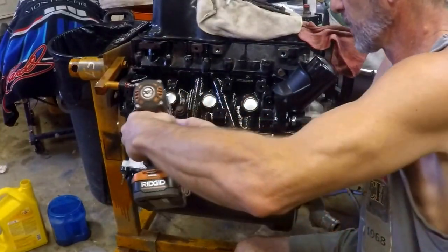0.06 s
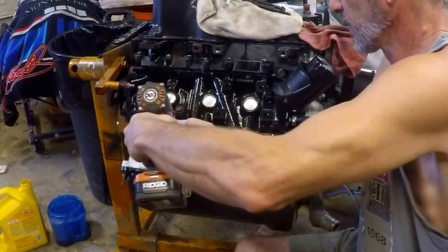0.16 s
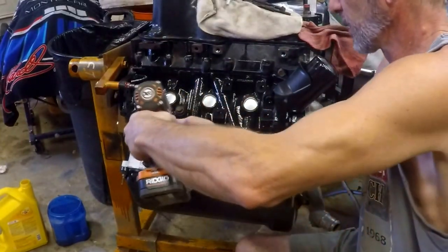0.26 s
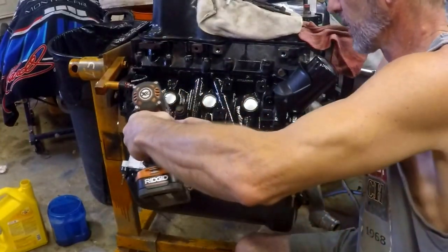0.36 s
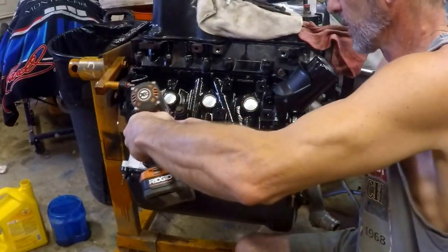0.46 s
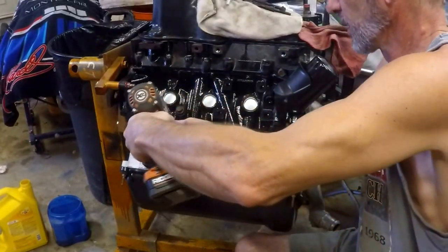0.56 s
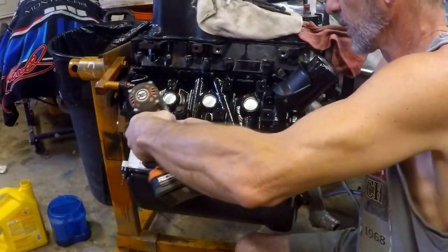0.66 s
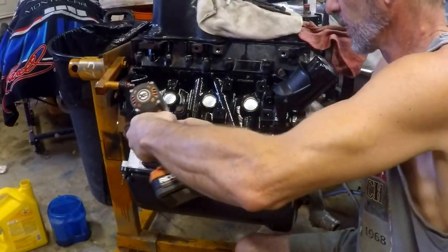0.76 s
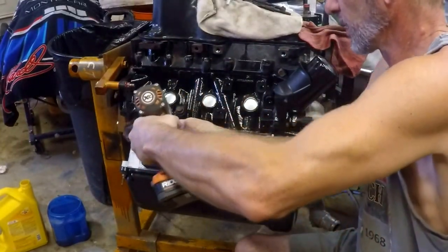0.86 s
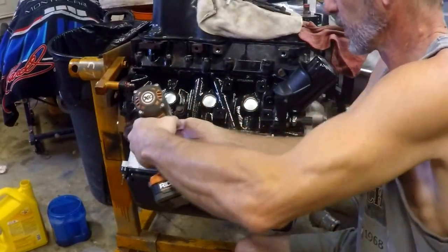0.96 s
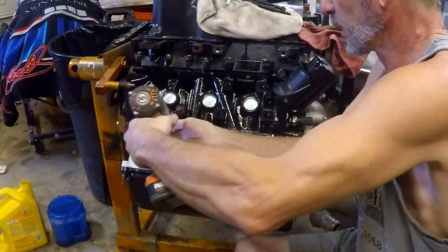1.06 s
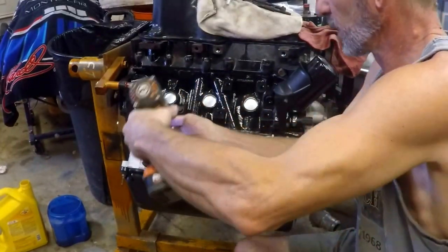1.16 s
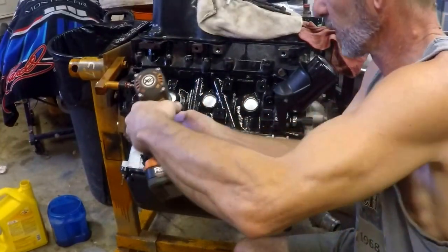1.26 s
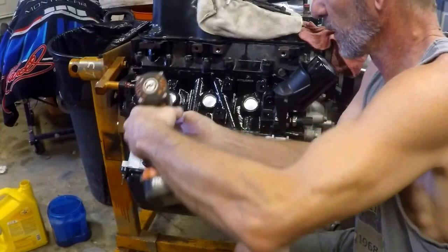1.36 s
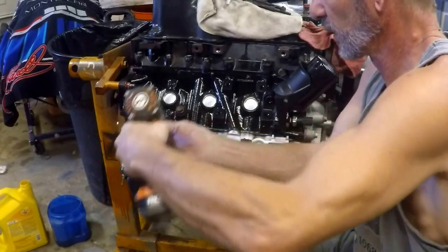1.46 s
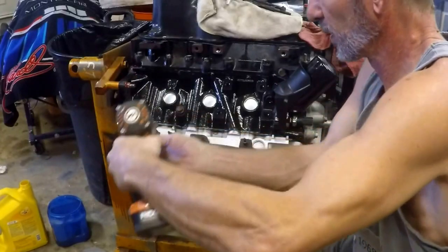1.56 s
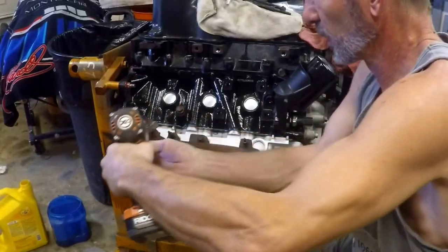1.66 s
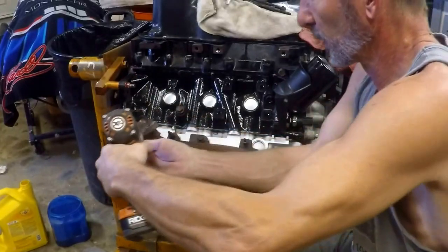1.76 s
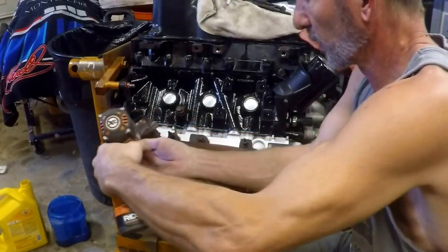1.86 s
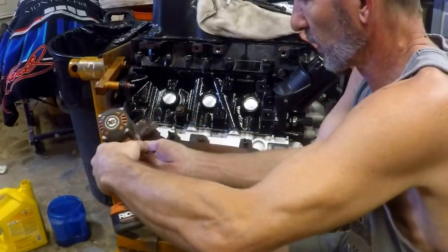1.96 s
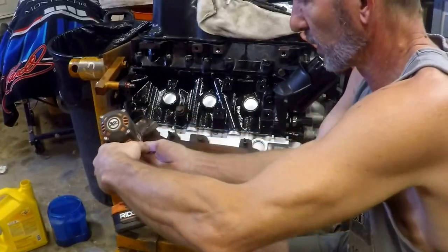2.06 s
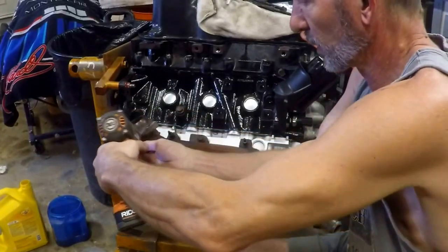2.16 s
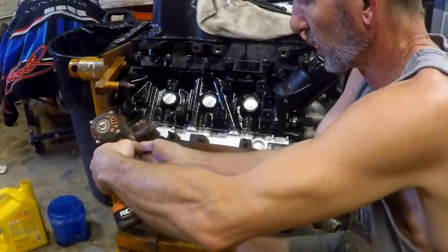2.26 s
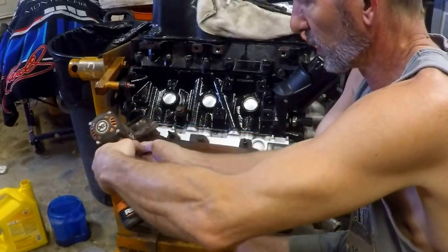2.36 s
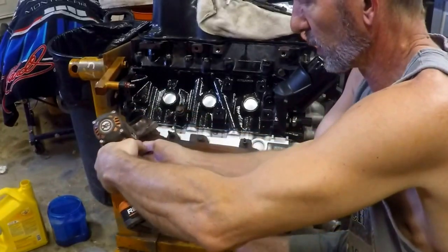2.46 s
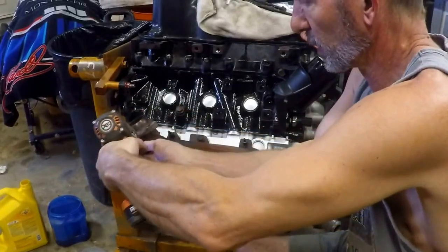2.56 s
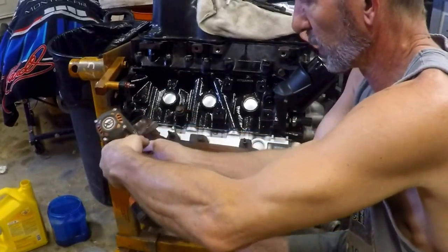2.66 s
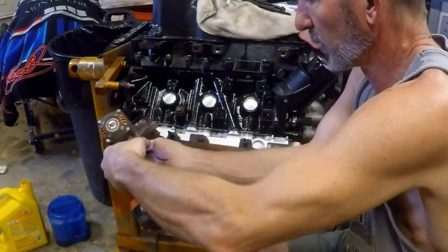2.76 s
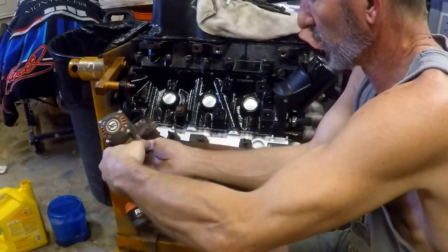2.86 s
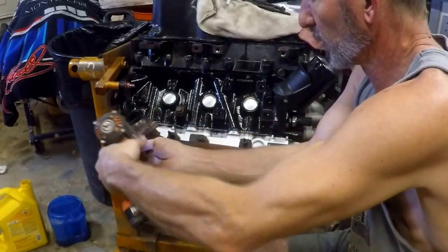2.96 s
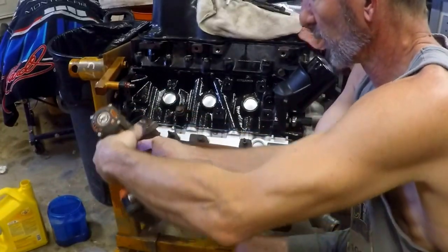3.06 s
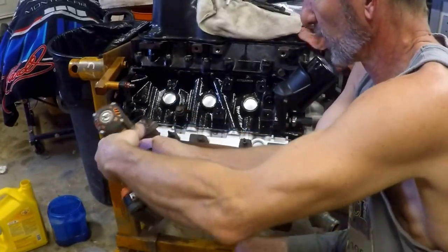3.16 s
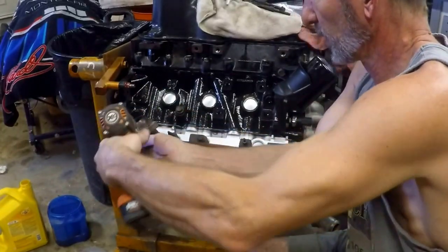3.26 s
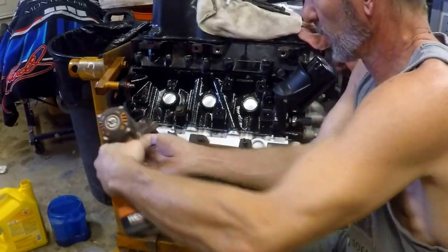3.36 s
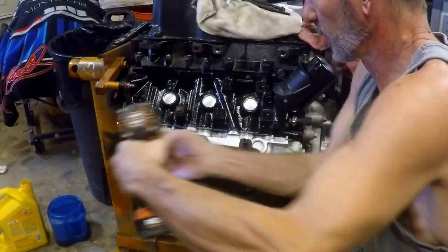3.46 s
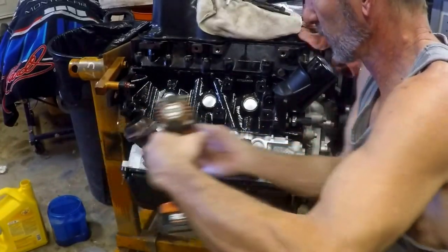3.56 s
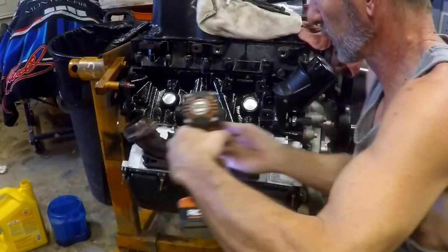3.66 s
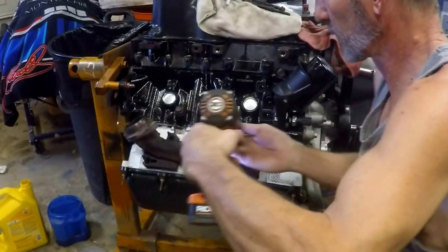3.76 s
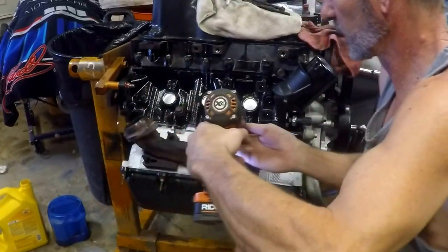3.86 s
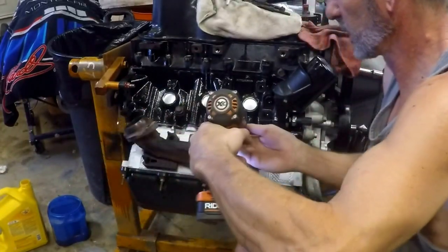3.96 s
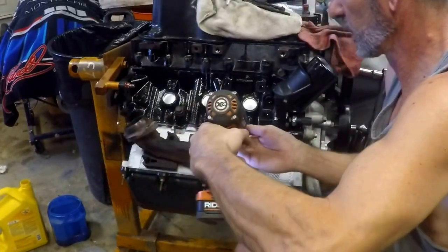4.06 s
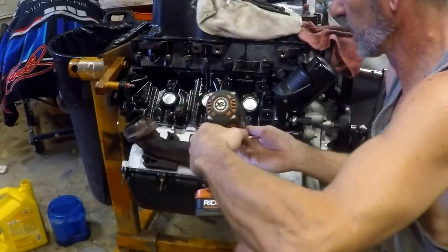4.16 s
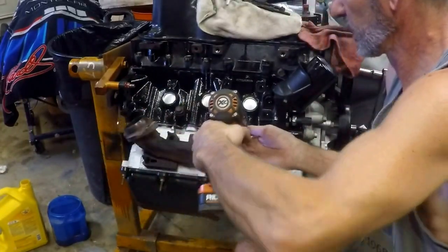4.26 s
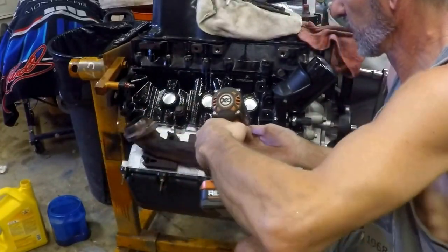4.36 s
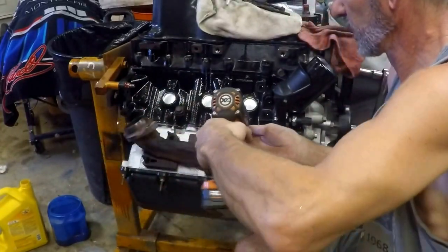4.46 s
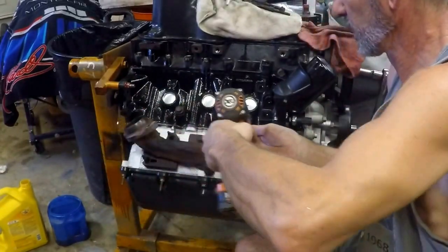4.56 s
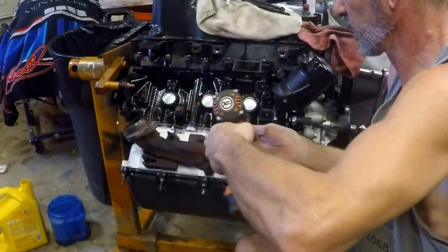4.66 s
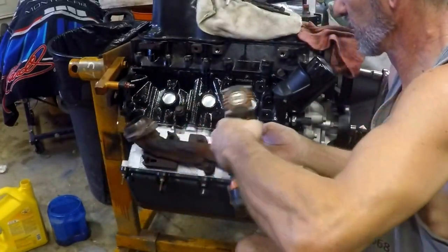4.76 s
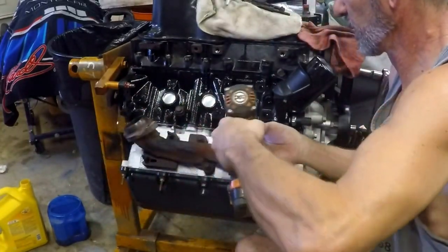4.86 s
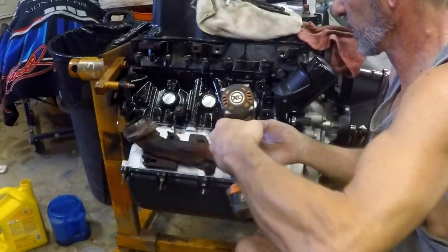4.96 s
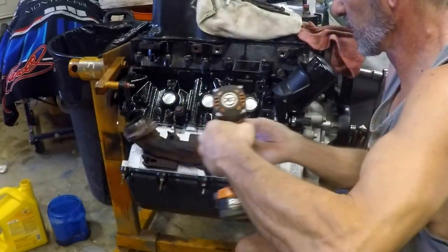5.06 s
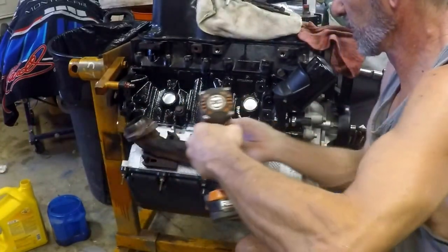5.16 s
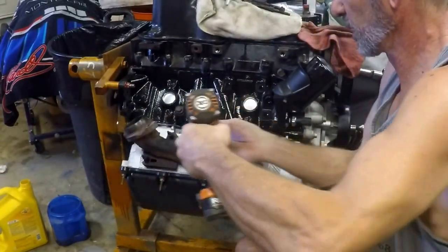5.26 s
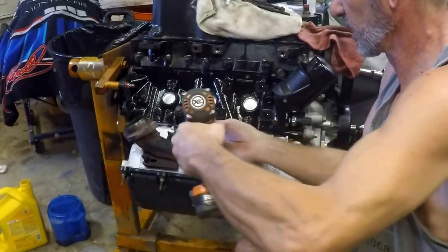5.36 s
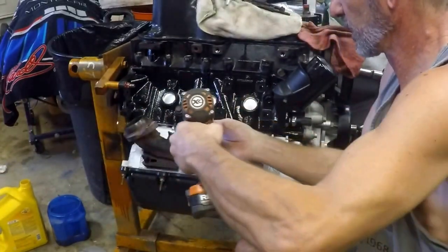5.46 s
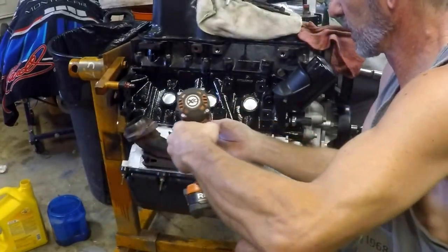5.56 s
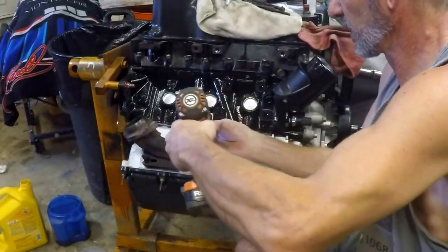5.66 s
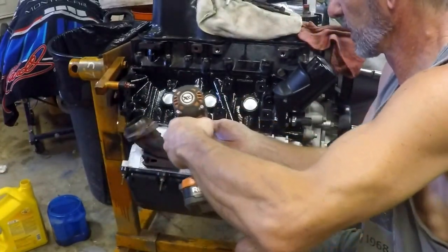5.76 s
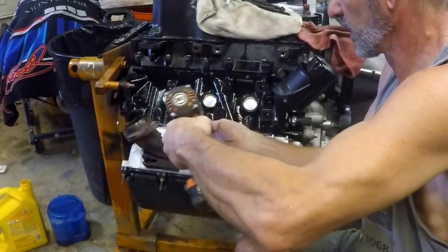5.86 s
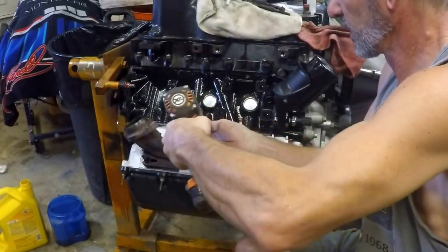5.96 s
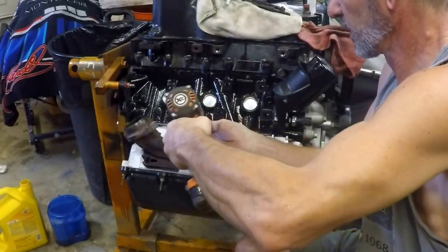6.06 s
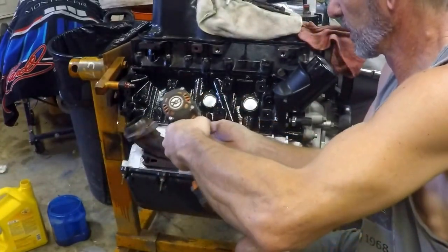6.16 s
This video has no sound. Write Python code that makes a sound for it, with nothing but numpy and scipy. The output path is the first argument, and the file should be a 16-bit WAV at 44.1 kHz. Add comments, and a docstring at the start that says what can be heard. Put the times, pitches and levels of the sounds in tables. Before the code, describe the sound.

A power driver whirs and hammers in four short, hard metallic bursts, with small clacks, scrapes and ringing taps between, over low workshop rumble.

```python
"""A cordless impact driver runs down four bolts on an engine block in a workshop, over a steady low rumble.
First come scrapes and small handling clacks (short noise bursts). At each pull of the trigger a switch clicks,
gears rattle and whine (speed-driven noise and tones), then a hammer strikes about 38 times a second (cracks and
ringing modes). Between pulls come more clacks and scrapes, and bouncing taps that ring the socket;
after the second pull the tool also bumps the engine casting. Reflections and room noise surround it all."""
import sys
import numpy as np
from scipy import signal
from scipy.fft import rfft, irfft
from scipy.io import wavfile
from scipy.ndimage import uniform_filter1d

SR = 44100
rng = np.random.default_rng(int(sys.argv[2]) if len(sys.argv) > 2 else 0)


def to_wav(sig):
    """Store sig (one row per channel, or 1-D mono) as 16-bit WAV at the path in sys.argv[1].

    Samples outside -1..1 are clipped; the rate is SR.
    """
    pcm = np.clip(np.atleast_2d(sig), -1, 1) * 32767
    pcm = np.round(pcm).astype(np.int16)
    wavfile.write(sys.argv[1], SR, pcm.T)  # frames by channels


N = 274213
TIME = np.arange(N) / SR

# Trigger pulls. Each row: pressed in seconds, released in seconds, highest free gear mesh rate in Hz,
# relative level running free in dB, relative level under load in dB, whine in dB before load lowers it.
TRIGGER_PULLS = [(.385, 0.681, 3484, -23.5, -17.5, -12), (2.248, 2.622, 3950, -22.5, -19, -2),
                 (4.402, 4.774, 3291, -20, -25.5, -5.5), (5.762, 6.22, 3910, -21, -22, -0.5)]
# The hammering in each pull. Each row: first blow in seconds, number of blows, time between blows in seconds,
# relative level of the first blow in dB, loss per blow in dB, boost of the lows in dB.
HAMMER_BURSTS = [(0.5524, 5, 0.026, -1, 1, 3), (2.508, 5, .0260, 0.5, 1.0, 1.5),
                 (4.4699, 10, .0261, -1.5, .5, -3), (6.165, 3, .0254, 1, 0, -5)]
# Tone colour shared by clacks, clicks, scrapes and chatter. Each row: frequency in Hz, relative level in dB.
CLACK_COLOUR = [(150, -9.5), (500, 1.5), (1200, 9), (2000, 0.5), (3400, -1), (5600, -4), (7500, -19.5),
                (10000, -24), (15000, -43.5)]


def from_db(db):
    """Turn decibels into a gain."""
    return 10 ** (np.asarray(db) / 20)


def rms_one(x):
    """Scale to an rms (average strength) of one."""
    return x / np.sqrt(np.mean(x ** 2) + 1e-20)


def unit_energy(x):
    """Scale to a total energy of one."""
    return x / np.sqrt(np.sum(x ** 2) + 1e-20)


def at_hz(points, hz):
    """Read a table between its points, on a log-frequency axis."""
    known, values = np.transpose(points)
    return np.interp(np.log(np.maximum(hz, 1)), np.log(known), values)


def add(track, s, sound):
    """Mix a sound into a track at time s."""
    start = int(np.clip(round(s * SR), 0, N - 1))
    track[start:start + len(sound)] += sound[:N - start]


def coloured(x, spectrum, low_db=0, treble_db=0, size=4096):
    """Filter to the given spectrum, with a shelf at each end, reacting as early as possible (minimum phase)."""
    hz = np.arange(size // 2 + 1) * SR / size
    low_shelf = low_db / (1 + (hz / 1600) ** 4)
    treble_shelf = treble_db * (1 - 1 / (1 + (hz / 5000) ** 4))
    # fade out below the lowest table frequency
    bottom = hz ** 2 / (hz ** 2 + (spectrum[0][0] / 2) ** 2) + 1e-3
    gain = from_db(at_hz(spectrum, hz) + low_shelf + treble_shelf) * bottom
    # folding the cepstrum (the log spectrum turned into time) gives the minimum phase
    cepstrum = irfft(np.log(gain))[:size // 2]
    cepstrum[1:] *= 2
    response = irfft(np.exp(rfft(cepstrum, size)))
    return signal.fftconvolve(x, response)[:len(x)]


def drift(rate):
    """Random wander that heads for a new value rate times a second."""
    knots = rng.standard_normal(8192)
    return np.interp(TIME * rate, np.arange(len(knots)), knots)


def burst(envelope, size=31):
    """Shaped noise of unit energy that spreads evenly over all frequencies, as a hard contact does."""
    spectrum = rfft(rng.standard_normal(len(envelope)) * envelope)
    local_power = uniform_filter1d(np.abs(spectrum) ** 2, size)
    even = irfft(spectrum / np.sqrt(local_power))
    first_half = np.arange(len(even)) < len(even) // 2
    return unit_energy(even * first_half)


def ringing(modes, t, scatter_db, split, count=5):
    """One blow on a body: each mode is a cluster of close partials that beat against each other."""
    out = 0
    for hz, db, t60 in modes:
        partials = hz * (1 + split * rng.uniform(-1, 1, (count, 1)))
        strengths = rng.standard_normal((count, 1))
        cluster = np.sum(strengths * np.sin(2 * np.pi * partials * t), axis=0)
        decay = from_db(-60 * t / t60)
        # a longer decay carries more energy
        strength = from_db(db + scatter_db * rng.standard_normal()) * np.sqrt(np.sum(decay ** 2) / 2)
        out = out + strength * unit_energy(cluster * decay)
    return out


def crack(t, t60, contact_s, colour, low_db, treble_db):
    """Hard parts meet: a dense noise burst swells during contact and dies quickly."""
    envelope = from_db(-60 * t / t60) * (1 - np.exp(-t / contact_s))
    return unit_energy(coloured(burst(envelope), colour, low_db, treble_db))


def hammer(crack_t60=0.013, contact_s=.0007, crack_db=16.5, anvil_db=4, size=8192):
    """Evenly spaced blows tend to weaken as the bolt tightens; each cracks, rebounds and rings anvil and bolt."""
    # Ringing of anvil, socket and bolt. Each row: frequency in Hz, relative level in dB,
    # time to fall by 60 dB in seconds.
    anvil_modes = [(302, -18, 0.36), (596, -25, 0.15), (1020, -8, 0.023), (1240, -13.5, .06),
                   (1496, -12, 0.073), (1670, -13.5, 0.038), (2200, -5, 0.037), (2618, -9.5, 0.022),
                   (2995, 7, 0.031), (3260, 5.5, 0.0098), (5590, 2, 0.05), (8670, 1.5, 0.043)]
    # Tone colour of a blow. Each row: frequency in Hz, relative level in dB.
    blow_colour = [(53, -54), (90, -42.5), (109, -19.5), (185, -15.5), (415, -10.5), (586, -8), (682, -8),
                   (1250, 2.5), (2230, -5.5), (2950, -6), (4260, -9.5), (5510, -7.5), (7780, -23.5),
                   (9050, -18), (13900, -31.5), (15500, -36)]
    last_blow_db = -4.5   # the final blow only glances off
    treble_db, scatter_db = 2.5, 1.9
    rebound_s, rebound_db = .0055, -9.5   # the hammer's second jaw lands a little late
    out, t = np.zeros(N), TIME[:size]
    for first_s, blows, period_s, first_db, loss_db, low_db in HAMMER_BURSTS:
        count = int(round(blows))
        for k, (force, lag) in enumerate(rng.standard_normal((count, 2))):
            s = first_s + k * period_s
            db = first_db - k * loss_db + last_blow_db * (k == count - 1) + scatter_db * force
            second_jaw_s = rebound_s * np.exp(.4 * lag)
            for delay, touch_db in ((0, 0), (second_jaw_s, rebound_db)):
                blow = crack(t[:size // 2], crack_t60, contact_s, blow_colour, low_db, treble_db)
                add(out, s + delay, from_db(db + touch_db + crack_db) * blow)
            ring = unit_energy(ringing(anvil_modes, t, scatter_db=2.5, split=0.018))
            add(out, s, from_db(db + anvil_db) * ring)
    return out


def pull_motion(pull, first_blow_s):
    """The motor starts, climbs, sags under the hammer and coasts: mesh Hz, level dB, whine gain and load (0-1)."""
    start_hz, climb_hz_per_s, spin_up_s = 3280, 2300, .016
    standing_slow_share, standing_db = .18, -16.5   # speed and level missing at the first instant
    loaded_hz, sag_s, loaded_whine_db = 3080, .06, -9
    seating_s = .04   # friction builds for this long before the first blow
    coast_s, coast_db_per_s = .17, 268
    whine_rise_s = .03   # the whine emerges once the gears are up to speed
    pressed_s, released_s, top_hz, free_db, loaded_db, whine_db = pull
    # seconds since each stage began
    run, hammering, coasting = (np.maximum(TIME - s, 0) for s in (pressed_s, first_blow_s, released_s))
    standing = np.exp(-run / spin_up_s)
    seated = np.clip((TIME - first_blow_s) / seating_s + 1, 0, 1)
    sag = 1 - np.exp(-hammering / sag_s)
    free_hz = np.minimum(start_hz + climb_hz_per_s * run, top_hz) * (1 - standing_slow_share * standing)
    hz = (free_hz + sag * (loaded_hz - free_hz)) * np.exp(-coasting / coast_s)
    db = free_db + standing_db * standing + seated * (loaded_db - free_db) - coast_db_per_s * coasting
    whine = from_db(whine_db + loaded_whine_db * sag) * (1 - np.exp(-run / whine_rise_s))
    return hz, db, whine, seated


def motor(rattle_db=3.0, backlash_hz=330, throb=0.16, teeth=18, level_db=-3.5, full_speed_hz=3500,
          hiss_rise=1.4, surge_db=-7, surge_s=0.063):
    """Gear teeth rattle in the housing, throbbing once a turn, with a rough whine that follows the speed."""
    # Tone colour of the housing. Each row: frequency in Hz, relative level in dB.
    motor_colour = [(150, -17), (450, -15.5), (540, -6), (750, -6.5), (1000, -2), (1280, 4.5), (1600, -7),
                    (1850, -1.5), (2300, -6), (3400, -0.5), (4250, -0.5), (5700, -1), (7200, -14),
                    (9500, -15.5), (15000, -35)]
    # Whine tones. Each row: multiple of the gear mesh rate, relative level in dB.
    gear_tones = [(1 / 3, -14), (0.99, -4.5), (4 / 3, -9.5)]
    load_hiss_db = 2.5   # loaded teeth hiss more
    coasting_kept_s = .34   # the sound is kept for this long after release
    mesh_hz, level, singing, surge, load = np.zeros((5, N))
    for pull, hammering in zip(TRIGGER_PULLS, HAMMER_BURSTS):
        hz, db, whine_gain, seated = pull_motion(pull, hammering[0])
        running = (TIME >= pull[0]) & (TIME <= pull[1] + coasting_kept_s)
        mesh_hz += running * hz
        level += running * from_db(db)
        singing += running * whine_gain
        load += running * seated
        surge += running * np.exp(-((TIME - pull[0]) / surge_s) ** 2)
    phase = 2 * np.pi * np.cumsum(mesh_hz) / SR
    turn_throb = 1 + throb * np.cos(phase / teeth)
    contacts = rng.standard_normal(N) * from_db(rattle_db * drift(500)) * turn_throb
    rattle = rms_one(coloured(contacts, motor_colour))
    # slow teeth meet softly, so the top of the rattle comes and goes with the speed
    hiss = signal.sosfiltfilt(signal.butter(2, 7000, "high", fs=SR, output="sos"), rattle)
    hiss_gain = (mesh_hz / full_speed_hz) ** hiss_rise * from_db(load_hiss_db * load)
    rattle = rattle + hiss * (hiss_gain - 1)
    whine = 0
    for k, db in gear_tones:
        # backlash (play between teeth) makes the force uneven, widening each tone into a narrow band
        sine_part = drift(backlash_hz * k) * np.sin(k * phase)
        cosine_part = drift(backlash_hz * k) * np.cos(k * phase)
        whine = whine + from_db(db) * (sine_part + cosine_part)
    # starting torque loads the slower gear stage, which sings briefly
    chirp = from_db(surge_db + 2.5 * drift(200)) * surge * np.sin(phase / 2)
    return from_db(level_db) * level * (rattle + singing * whine + chirp)


def trigger(click_t60=0.017, click_db=-17, treble_db=10, size=4096):
    """A small, bright switch click as the motor starts."""
    out = np.zeros(N)
    for pull in TRIGGER_PULLS:
        click = crack(TIME[:size], click_t60, 0.0011, CLACK_COLOUR, -4, treble_db)
        add(out, pull[0], from_db(click_db) * click)
    return out


def handling_clacks(clack_t60=0.046, contact_s=0.00076, clack_db=11, ring_t60=0.015, ring_db=8, size=4096):
    """Small handling clacks: a noise burst plus a short resonance at a pitch of its own."""
    # Socket and tool knocking on the bolts, and the trigger or ratchet letting go near 1.05 and 2.89 s.
    # Each row: time in seconds, relative level in dB, boost of the lows in dB, boost of the treble in dB,
    # main resonance in Hz.
    clack_list = [(0.1726, -22.5, 10, 22, 3500), (.1817, -21, 6, 9, 1110), (0.2279, -27, -7, 11, 1270),
                  (1.0455, -29, -5, 2, 3080), (2.0393, -26.5, 1, 2, 840), (2.1124, -14, 4.5, -2, 1230),
                  (2.8901, -24, -11, -1, 3220), (3.1654, -37, 1, 1, 3570), (4.129, -34.5, 0.5, 2, 1960),
                  (4.1776, -27, 5.5, -6, 1820), (4.2239, -28, -5, -2, 1120), (4.29, -21.5, -0.5, 2, 1060),
                  (4.4592, 1, -2, 13, 1300)]
    out, t = np.zeros(N), TIME[:size]
    for s, db, low_db, treble_db, hz in clack_list:
        clack = from_db(clack_db) * crack(t, clack_t60, contact_s, CLACK_COLOUR, low_db, treble_db)
        resonance = ringing([(hz, 0, ring_t60)], t, scatter_db=0, split=0.14)
        ring = from_db(ring_db) * unit_energy(resonance)
        add(out, s, from_db(db) * (clack + ring))
    return out


def scrapes(grain_db=5, level_db=-2):
    """Sliding steel catches and slips in uneven grains."""
    # The socket slides on a bolt head. Each row: start in seconds, length in seconds, relative level in dB.
    slides = [(0.02, 0.33, -46.5), (1.059, 0.22, -46), (1.416, 0.21, -54), (1.874, 0.37, -46),
              (3.157, 0.15, -45.5), (4.172, .26, -46.5), (4.938, 0.079, -47), (5.70, .095, -48)]
    pressure = np.zeros(N)
    for s, length, db in slides:
        progress = np.clip((TIME - s) / length, 0, 1)
        pressure += from_db(db) * np.sqrt(np.sin(np.pi * progress).clip(0))
    grains = rng.standard_normal(N) * from_db(grain_db * drift(280))
    return from_db(level_db) * pressure * rms_one(coloured(grains, CLACK_COLOUR, low_db=7.0, treble_db=6.5))


def clinks(taps, modes, level_db, split, treble_db, chatter_t60=0.067, size=14000):
    """Light, bouncing taps on metal that is free to ring; the parts chatter briefly against each other."""
    bounce_s, bounce_loss_db = .019, 5   # each further touch follows this late and this much weaker
    out, t = np.zeros(N), TIME[:size]
    for first_s, ring_db, chatter_db, touches in taps:
        for k in range(int(round(touches))):
            ring = from_db(ring_db + level_db) * ringing(modes, t, scatter_db=4.0, split=split)
            chatter = from_db(chatter_db) * crack(t, chatter_t60, .001, CLACK_COLOUR, 0, treble_db)
            add(out, first_s + k * bounce_s, from_db(-k * bounce_loss_db) * (ring + chatter))
    return out


def socket_taps():
    """The socket slips off and rings at its own modes."""
    # Each row: first touch in seconds, relative ring level in dB, relative chatter level in dB, touches.
    slips = [(1.124, -47.5, -27, 3), (1.195, -43.5, -36, 1), (4.934, -38, -15.5, 4)]
    # Each row: frequency in Hz, relative level in dB, time to fall by 60 dB in seconds.
    socket_modes = [(840, -0.5, 0.28), (1182, -1.5, .2), (1486, 3, 0.12), (2086, 2.5, 0.2),
                    (2190, -0.5, 0.25), (2328, -4, .24), (3450, -6.5, 0.13), (4130, -8, 0.19),
                    (5750, -3, 0.18), (7200, -15, 0.2), (9000, -13.5, 0.25), (10400, -19, 0.19)]
    return clinks(slips, socket_modes, level_db=-4.5, split=0.0295, treble_db=20.0)


def casting_taps():
    """The tool bumps the engine casting, which rings at its own modes."""
    # Each row: first touch in seconds, relative ring level in dB, relative chatter level in dB, touches.
    bumps = [(3.225, -39.5, -13, 1), (3.266, -33.5, -7, 3)]
    # Each row: frequency in Hz, relative level in dB, time to fall by 60 dB in seconds.
    casting_modes = [(531, 2.5, 0.11), (760, -7, 0.057), (1085, 6.5, 0.084), (1300, -6, 0.08),
                     (1956, 7.5, 0.13), (2475, -5, 0.088), (2990, -9.5, 0.2), (3900, -6.5, 0.23),
                     (4710, 0, 0.15), (5180, -5, 0.11), (6100, -3, 0.077), (7000, -10, 0.12),
                     (7900, -11, 0.12), (9300, -18, 0.14)]
    return clinks(bumps, casting_modes, level_db=-4, split=0.033, treble_db=7.0)


def reflections(wet_db, build_s=0.014, size=32768):
    """Echoes off the engine and floor, and a diffuse tail that dies band by band."""
    # Workshop decay. Each row: frequency in Hz, time to fall by 60 dB in seconds.
    workshop_t60 = [(150, 0.5), (600, 0.4), (1300, 0.37), (4000, 0.42), (8000, 0.33), (14000, 0.39)]
    # Nearby surfaces. Each row: delay in seconds, level in dB, treble lift in dB.
    echoes = [(.0030, -14.5, -1.5), (.0050, -14.5, 4.5), (.0068, -15, 5.5)]
    t, edges = TIME[:size], np.geomspace(60, 18000, 13)
    response = np.zeros(size)
    for low, high in zip(edges, edges[1:]):
        band_filter = signal.butter(3, [low, high], "band", fs=SR, output="sos")
        band = signal.sosfilt(band_filter, rng.standard_normal(size))
        t60 = at_hz(workshop_t60, np.sqrt(low * high))
        envelope = from_db(-60 * t / t60) * (1 - np.exp(-(t / build_s) ** 2))
        # wider bands carry more energy
        response += from_db(wet_db) * unit_energy(band * envelope) * np.sqrt(2 * (high - low) / SR)
    for delay, db, lift_db in echoes:
        # cluttered surfaces smear each echo
        smear = burst(np.exp(-t[:2048] / 0.00066))
        treble = signal.sosfilt(signal.butter(1, 4500, "high", fs=SR, output="sos"), smear)
        add(response, delay, from_db(db) * (smear + (from_db(lift_db) - 1) * treble))
    return response


def workshop(x, count=4):
    """Tool and arms keep moving, so the sound passes smoothly from one pattern of reflections to the next."""
    # Hand and tool body shade the straight path. Each row: frequency in Hz, level in dB.
    straight_path = [(60, -2), (600, -1.5), (1200, -2.5), (3300, 3), (4800, -4), (7000, -7), (14000, 3)]
    out = coloured(x, straight_path)
    position = TIME * 18   # patterns passed, 18 a second
    for k in range(count):
        distance = np.abs((position - k) % count - count / 2)
        share = np.cos(np.pi / 2 * np.minimum(distance, 1))
        out = out + signal.fftconvolve(x * share, reflections(wet_db=-4.0))[:N]
    return out


def background(air_db=-51, rumble_db=-44):
    """Steady ventilation noise over a low, uneven rumble, both made of filtered noise."""
    # Each row of both tables: frequency in Hz, relative level in dB.
    air_colour = [(59, -30.5), (100, 2.5), (209, -8), (281, -7.5), (370, -7), (497, -8), (668, -10),
                  (742, -7), (825, -7), (977, -8), (1660, -18), (2090, -23.5), (2690, -25), (5280, -30.5),
                  (15500, -55.5)]
    rumble_colour = [(15, -34.5), (28, 2.5), (40, 2), (48, 4.5), (57, 6.5), (68, 1), (85, -7), (110, -35),
                     (160, -50.5)]
    # the first 8192 samples let the filters settle and are dropped
    air = coloured(rng.standard_normal(N + 8192), air_colour)[-N:]
    rumble = coloured(rng.standard_normal(N + 8192), rumble_colour, size=32768)[-N:]
    return from_db(air_db) * rms_one(air) + from_db(rumble_db) * rms_one(rumble)


def scene():
    """Driver and handling sounds in the workshop, alike in both channels."""
    driver = hammer() + motor() + trigger()
    handling = handling_clacks() + scrapes() + socket_taps() + casting_taps()
    mono = workshop(driver + handling) + background()
    return np.stack([mono, mono])


def record(dry):
    """The loudest peaks are rounded and the top is cut."""
    ceiling, cutoff_hz = .88, 15400
    rounded = ceiling * np.tanh(dry / ceiling)
    return signal.sosfilt(signal.ellip(12, .1, 90, cutoff_hz, fs=SR, output="sos"), rounded)


dry = scene()
out = record(dry)
to_wav(out)
```